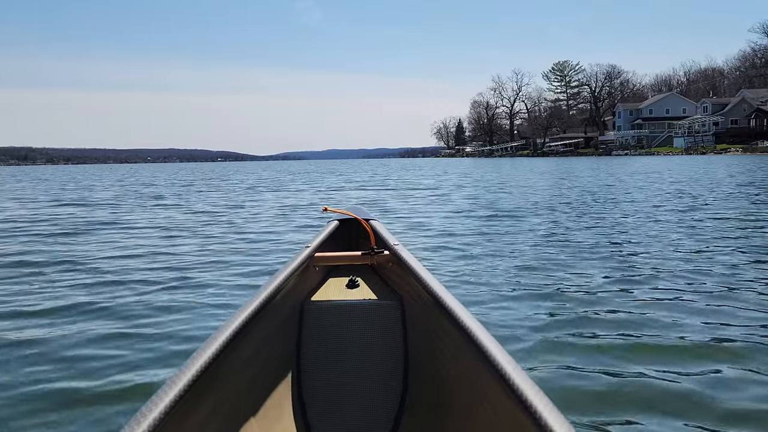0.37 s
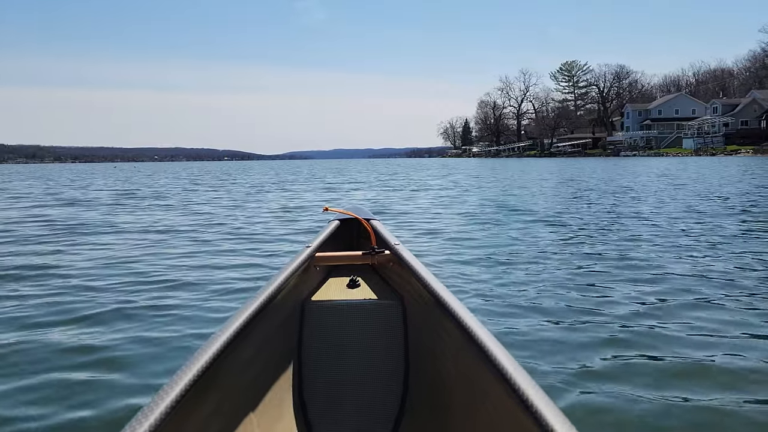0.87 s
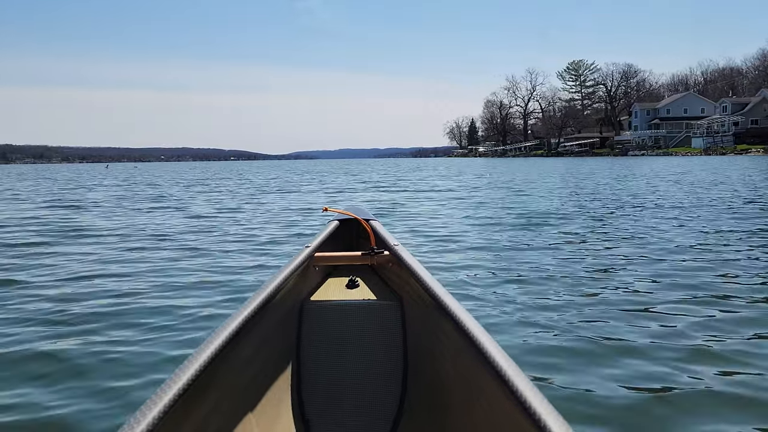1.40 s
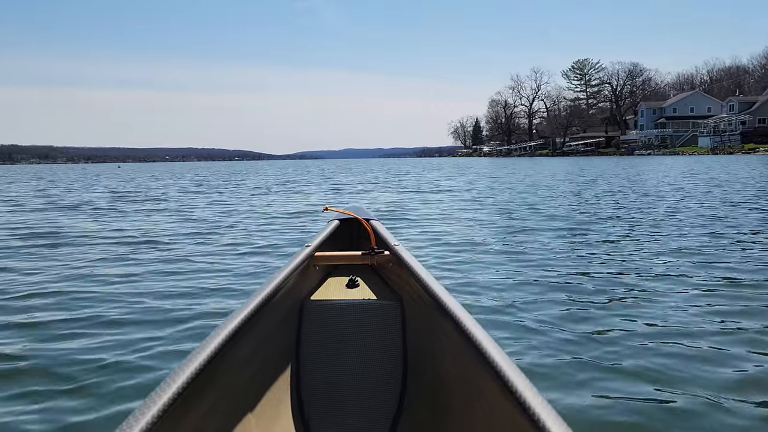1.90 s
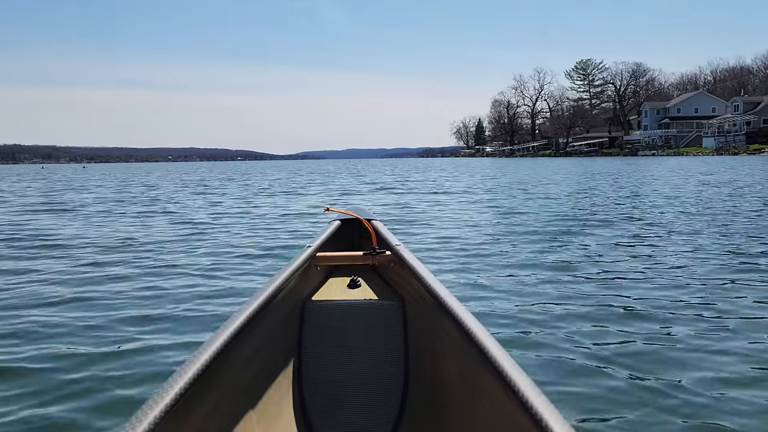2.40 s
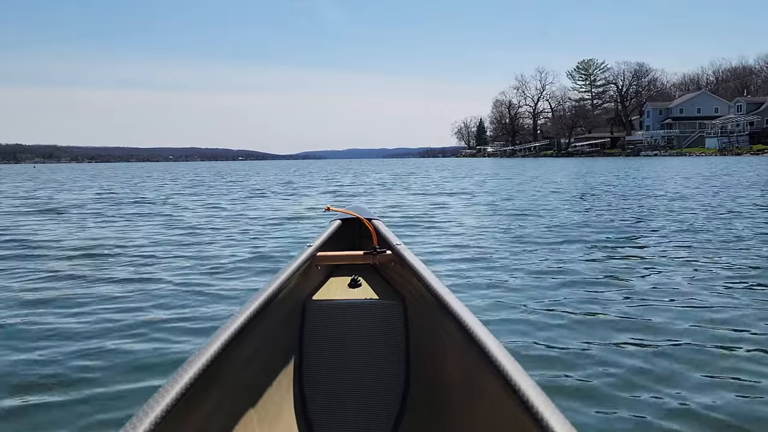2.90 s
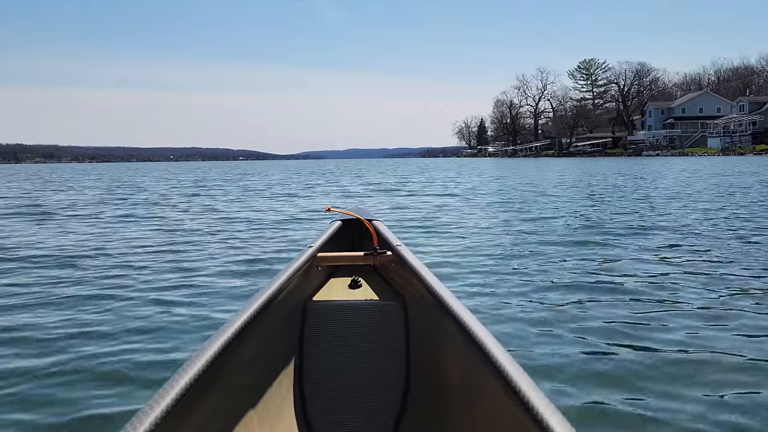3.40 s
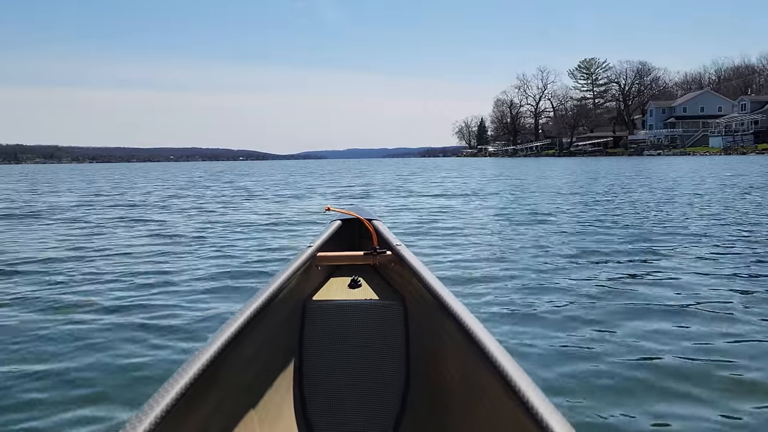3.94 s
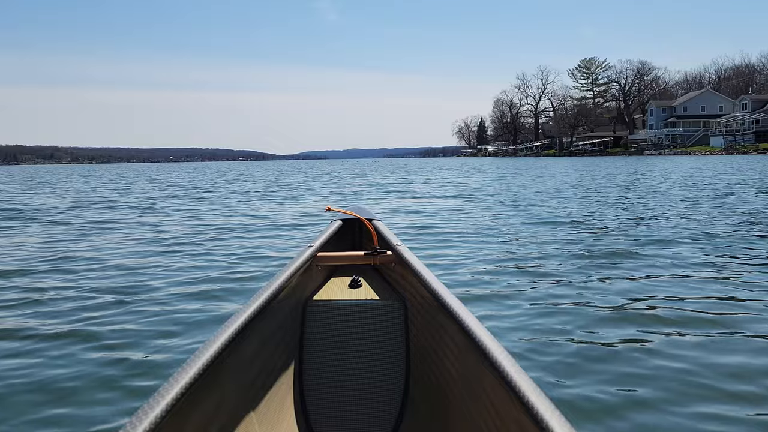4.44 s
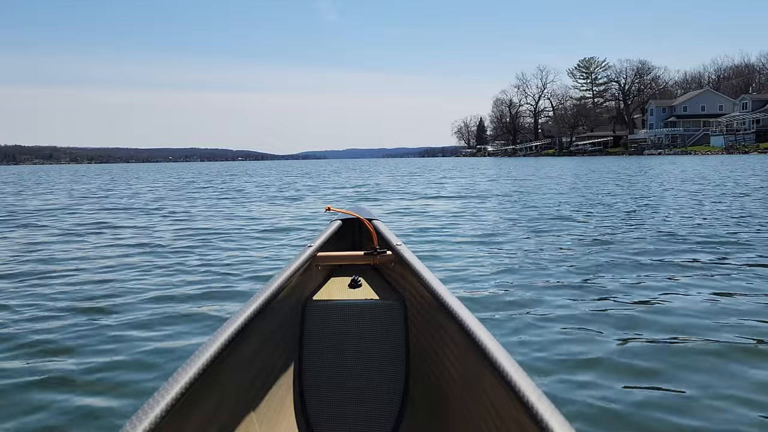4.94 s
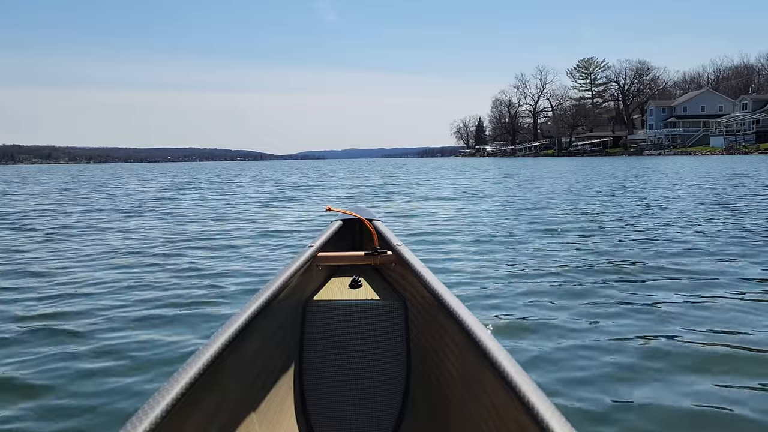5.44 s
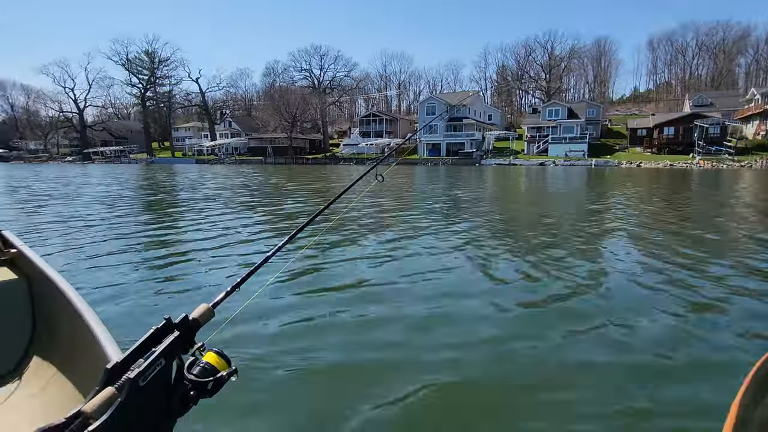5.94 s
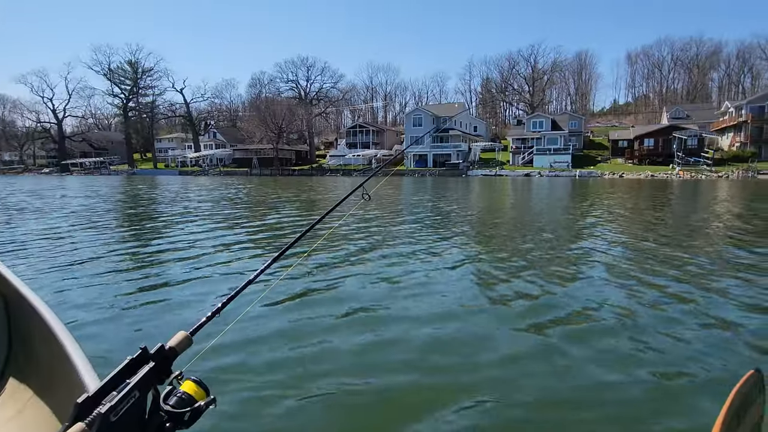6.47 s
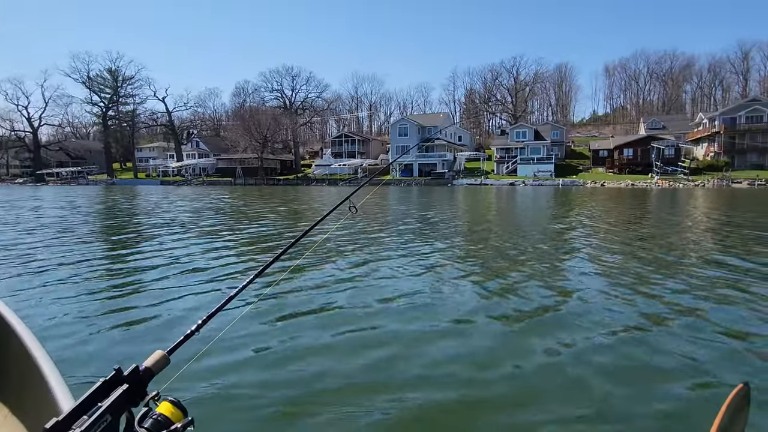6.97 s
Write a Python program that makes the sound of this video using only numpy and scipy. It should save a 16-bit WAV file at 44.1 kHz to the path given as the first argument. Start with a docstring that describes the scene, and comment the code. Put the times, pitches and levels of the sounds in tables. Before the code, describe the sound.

From 0 to 0.3 s, a paddle blade splashes close on the right, with bright fizz, sharp droplets and gurgling water. Trickles continue, with another splash at 0.5-0.8 s and a very light knock near 0.54. At 1.04 s the shaft thuds on the hollow hull, knocks again at 1.13, then gives a strong thump at 1.29 with a quick rattle of weaker knocks to 1.45; a bright drip lands at 1.34. From 1.6 to 6 s the water is much quieter: small wavelets, plinking drops and round low glugs, clearest around 2.2-2.3 s, slowly thinning. Faint falling bird chirps come at 3.3, 4.9 and 5.8 s on the right. Low distant rumble and slight hiss run throughout. Just before 6 s the water stops abruptly, leaving rumble, hiss and very faint wavering bird whistles until about 7.1 s.

```python
"""Water splashes and trickles off a canoe paddle on the right, as swarms of damped-sine bubbles over patchy noise.
Single drops and hollow glugs are damped sines; the shaft knocks on the hull as ringing modes under a noise crack.
Ripples gurgle along the side as the boat glides, then the water stops and the end is quieter.
Far rumble and hiss are filtered noise, small birds are gliding sines; two ports a few centimetres apart hear it all."""
import sys
import numpy as np
from scipy import signal
from scipy.fft import rfft, irfft, next_fast_len
from scipy.io import wavfile
from scipy.ndimage import uniform_filter1d, map_coordinates

SR = 44100
rng = np.random.default_rng(int(sys.argv[2]) if len(sys.argv) > 2 else 0)


def output_pcm(signal):
    """Save a mono or channel-first signal as 16-bit PCM at the path in sys.argv[1].

    Samples are clipped to [-1, 1] before scaling.
    """
    pcm = np.clip(np.atleast_2d(signal).T, -1, 1) * 32767
    wavfile.write(sys.argv[1], SR, np.round(pcm).astype(np.int16))


def elevation(decibels):
    """Turn decibel levels (scalar or array-like) into linear amplitude ratios."""
    levels = np.asarray(decibels, float)
    return 10 ** (levels / 20)


N = 312669
LAG_MS = 0.21  # sound from the right reaches the left port this much later


def unit(x):
    """Scaled to rms 1."""
    return x / np.sqrt(np.mean(x ** 2) + 1e-20)


def along(points, hz):
    """Reads (f/Hz, value) points on a log frequency axis."""
    f, v = np.transpose(points)
    return np.interp(np.log(hz + 1), np.log(f + 1), v)


def curves(rows):
    """One value per sample for each column after the time."""
    s, *cols = np.transpose(rows)
    return [np.interp(np.arange(N) / SR, s, c) for c in cols]


def wobble(rate):
    """A smooth random curve, rate knots a second."""
    knots = rng.standard_normal(int(N * rate / SR) + 4)
    return map_coordinates(knots, [np.arange(N) * rate / SR])


def filtered(x, response):
    """x shaped by a complex response of frequency."""
    m = next_fast_len(N + 8192)
    return irfft(rfft(x, m) * response(np.fft.rfftfreq(m, 1 / SR)), m)[..., :N]


def rush(spectrum, alike, patchy_db):
    """Stereo noise of rms 1: random gain patches, a spectrum, and a left-right likeness per frequency."""
    z = signal.stft(rng.standard_normal((2, N)), nperseg=512)[2]
    field = uniform_filter1d(rng.standard_normal(z.shape[1:]), size=5, axis=0)
    field = uniform_filter1d(field, size=4, axis=1)
    pair = signal.istft(z * elevation(patchy_db * unit(field)), nperseg=512)[1][:, :N]

    def mid_side(hz):
        turn = np.arccos(np.clip(along(alike, hz), -1, 1)) / 2
        return elevation(along(spectrum, hz)) * [np.cos(turn), np.sin(turn)]

    mid, side = filtered(pair, mid_side)
    return unit(np.array([mid + side, mid - side]))


# left-right balance of sound from the right, before each source scales it: (f/Hz, left-right level/dB)
SIDE_BALANCE = [(300, 0), (2400, -2.5), (5000, -11.5), (8000, -11.5), (15000, 9.5)]


def from_right(pair, shade):
    """Sound from the right reaches the left port late and tilts the ports' balance by shade times the table."""
    sides = np.array([[1], [-1]])  # left, right

    def response(hz):
        gain = elevation(sides * shade * along(SIDE_BALANCE, hz) / 2)
        return gain * np.exp(-1j * np.pi * hz * sides * LAG_MS / 1000)

    return filtered(pair, response)


def bubbles(s, db, hz, t60, pan_db, rise, lag_ms, size):
    """Bubbles ring as damped sines that glide in pitch (rise: fraction per s); the left port lags by lag_ms."""
    out = []
    start = np.round(s * SR).astype(int)[:, None] + np.arange(size)
    for side in (1, -1):
        t = np.maximum(np.arange(size) / SR - (0.00024 + side * lag_ms[:, None] / 2000), 0)
        glide = np.minimum(t, t60[:, None] / 2)  # the neck closes, the pitch settles
        phase = 2 * np.pi * hz[:, None] * (t + rise[:, None] * glide * (t - glide / 2))
        swell = 1 - np.exp(-t * hz[:, None] * 4.6)
        decay = elevation((db + side * pan_db / 2)[:, None] - 60 * (t / t60[:, None]) ** 1.63)
        wave = decay * swell * np.sin(phase)
        out.append(np.bincount(start.ravel(), wave.ravel(), N + size)[:N])
    return np.array(out)


def swarm(breaking_db, count, hz, octaves, cycles, spread_db, size):
    """Random small bubbles of rms 1 in all, bunched where ripples break; each rings for about so many cycles."""
    u = rng.random((count, 3))
    g = rng.standard_normal((count, 3))
    chance = np.cumsum(elevation(breaking_db + 4.5 * wobble(30)))
    s = np.interp(u[:, 0], chance / chance[-1], np.arange(N) / SR)
    pitch = np.clip(hz * 2 ** (octaves * g[:, 0]), 200, 15000)
    t60 = np.minimum(cycles * np.exp(0.51 * g[:, 1]) / pitch, size / SR)
    level_db = -spread_db * np.log(u[:, 1])
    return unit(bubbles(s, level_db, pitch, t60, 9.1 * g[:, 2], 0.36 * u[:, 2] / t60, 0 * s, size))


# water running off the blade, calming as the boat slows: (t/s, fizz level/dB, gurgle level/dB)
RUNOFF_LEVELS = [(0, -64, -53), (.4, -67, -59), (.95, -70.5, -62), (1.25, -67, -54), (1.6, -79.5, -62),
                 (3.5, -81.5, -64), (5.98, -84.5, -66.5)]
# blade splashes, then wavelets that break on the side: (t/s, hold/s, fizz level/dB, gurgle level/dB)
SPLASH_EVENTS = [(0, 0.051, -56.5, -50), (0.127, 0.032, -57, -70), (0.256, 0.011, -69, -58),
                 (0.528, 0.0087, -56, -46.5), (0.56, 0.061, -57.5, -56), (0.737, 0.045, -61, -65),
                 (0.833, 0.012, -66, -57), (1.81, .06, -76, -63), (2.114, 0.093, -74.5, -69),
                 (2.333, 0.064, -75, -79), (2.53, 0.052, -88, -63), (2.764, 0.033, -78, -76),
                 (3.135, 0.15, -75.5, -86), (3.461, 0.077, -82, -60), (3.82, 0.033, -74.5, -62),
                 (4.143, 0.14, -77, -62), (4.363, 0.097, -77, -72), (4.81, 0.036, -81, -62.5),
                 (5.068, 0.035, -76, -63.5), (5.4, 0.017, -73.5, -65), (5.734, 0.022, -87.5, -65),
                 (5.857, .1, -81, -71.5)]


def stir():
    """Fizz, gurgle and spray drive: each splash swells, holds and dies over the run-off, adding in power."""
    rise_db_s, fall_db_s = 500, 169
    t = np.arange(N) / SR
    power = elevation(2 * np.array(curves(RUNOFF_LEVELS)))
    for s, hold, *peak_db in SPLASH_EVENTS:
        loss_db = rise_db_s * np.maximum(s - t, 0) + fall_db_s * np.maximum(t - s - hold, 0)
        power = power + elevation(2 * (np.array(peak_db)[:, None] - loss_db))
    fizz_db, gurgle_db = 10 * np.log10(power)
    spray_db = -70 + 1.66 * (fizz_db + 58)  # fine spray grows faster than the fizz
    return fizz_db, gurgle_db, spray_db


# air pockets under the hull's curve: (f/Hz, width/Hz, relative level/dB, t/s when it fills with water)
AIR_POCKETS = [(525, 16, -1.5, 4.6), (841, 46, -5, 7.5)]


def pockets():
    """Small slaps, as uneven noise, ring each air pocket's resonance until it fills."""
    out, t = 0, np.arange(N) / SR
    for centre, width, db, full in AIR_POCKETS:
        fade = np.clip((full - t) / 0.37, 0, 1)
        slaps = rng.standard_normal(N) * elevation(6.9 * wobble(25)) * fade
        ring = filtered(slaps, lambda f: 1j * f * width / (centre * centre - f * f + 1j * f * width))
        out = out + elevation(db) * unit(ring)
    return out


# noise colour of the gurgle: (f/Hz, relative level/dB per Hz)
GURGLE_COLOUR = [(150, -36), (250, -3), (675, -6.5), (861, -5), (1010, -10.5), (3500, -22.5), (4550, -47.5),
                 (7700, -120)]


def gurgle_layer(breaking_db):
    """Low water: patchy noise, ringing air pockets and a swarm of larger bubbles."""
    gurgle = 0.65 * rush(GURGLE_COLOUR, [(300, 0.79), (2000, 0.13)], patchy_db=6.5) + 0.3 * pockets()
    gurgle += 0.65 * swarm(breaking_db, count=1400, hz=1149.5, octaves=0.617, cycles=63, spread_db=1.5, size=1500)
    return gurgle


# noise colour of the fizz: (f/Hz, relative level/dB per Hz)
FIZZ_COLOUR = [(1500, -10.5), (2200, -1), (3100, 1), (4200, -8), (5800, -26.5), (7300, 2), (8400, -13.5),
               (10000, -27.5)]
# broad hiss of a strong splash: (f/Hz, relative level/dB per Hz)
WASH_COLOUR = [(900, -29.5), (1800, -3), (4500, 1), (7500, -10.5), (10000, -19.5)]


def fizz_layer(breaking_db, fizz_db):
    """Bright water: small bubbles and droplet ticks that merge into a smooth wash in a strong splash."""
    merge = elevation(.3 * (fizz_db + 78))
    fizz = 0.52 * merge * rush(FIZZ_COLOUR, [(3000, 0.18)], patchy_db=4)
    fizz += 0.83 * swarm(breaking_db, count=1800, hz=2870, octaves=0.43, cycles=34, spread_db=4.5, size=900)
    fizz += 0.5 * swarm(breaking_db, count=1500, hz=6420, octaves=0.23, cycles=72, spread_db=3.0, size=400)
    # droplets hit with a short tick
    ticks = swarm(breaking_db, count=700, hz=4530, octaves=0.45, cycles=5.7, spread_db=4.0, size=120)
    fizz += 0.16 * merge ** .6 * ticks
    fizz += 0.22 * merge * rush(WASH_COLOUR, [(3000, .3)], patchy_db=2.0)
    return fizz


def spray_layer(breaking_db):
    """Fine spray: top-end noise with a swarm of tiny ticks."""
    colour = [(8000, -30), (9500, -7), (13000, -6), (15800, -7), (16300, -40)]
    spray = 1.3 * rush(colour, [(9000, .3)], patchy_db=4)
    ticks = swarm(breaking_db, count=1200, hz=11500, octaves=.3, cycles=12, spread_db=6.5, size=200)
    return spray + 0.64 * ticks


def water():
    """Gurgle, fizz and spray follow the stirring of the water, surging together, until it falls silent."""
    glide_end = 5.98  # s
    fizz_db, gurgle_db, spray_db = stir()
    surge = wobble(9.8)
    breaking_db = 5.5 * wobble(14)  # all bubble sizes crowd where a ripple breaks
    mix = elevation(gurgle_db + 0.2 * surge) * gurgle_layer(breaking_db)
    mix += elevation(fizz_db + 0.53 * surge) * fizz_layer(breaking_db, fizz_db)
    mix += elevation(spray_db + 0.53 * surge) * spray_layer(breaking_db)
    return from_right(mix * (np.arange(N) / SR < glide_end), shade=0.83)


# slow ride of the far rumble: (t/s, level/dB rms before a small random waver)
RUMBLE_LEVEL = [(.5, -50.5), (1.8, -49.5), (2.3, -52.5), (2.9, -54), (3.7, -53), (5.75, -52), (6.1, -53.5)]
# colour of the rumble: (f/Hz, relative level/dB per Hz)
RUMBLE_COLOUR = [(13, -44.5), (22, -25), (53, -3.5), (107, -1.5), (129, -6.5), (180, -11.5), (226, -19.5),
                 (288, -23.5), (320, -22), (1400, -47.5), (1820, -85.5), (3080, -120)]
# how alike the ports hear the rumble: (f/Hz, left-right likeness)
RUMBLE_LIKENESS = [(60, 1), (180, 0.96), (600, .2), (1500, 0)]
# colour of the hiss: (f/Hz, relative level/dB per Hz)
HISS_COLOUR = [(700, -40.5), (1300, 4), (2500, -0.5), (6000, -7), (7800, -2.5), (9000, -27), (15000, -8),
               (16300, -33.5)]


def air():
    """Far low rumble and the microphone's own steady hiss, both filtered noise."""
    rumble_db = curves(RUMBLE_LEVEL)[0] + 1.3 * wobble(4.52)
    rumble = elevation(rumble_db) * rush(RUMBLE_COLOUR, RUMBLE_LIKENESS, patchy_db=-0.04)
    hiss = elevation(-82.5) * rush(HISS_COLOUR, [(3000, 0)], patchy_db=0)
    return rumble + hiss


def followers(s, db, hz, count):
    """Every loud bubble starts with a tick of impact and sheds a few smaller neighbours just after."""
    s, db, hz = np.repeat([s, db, hz], count, axis=1)
    u, g = rng.random(len(s)), rng.standard_normal((len(s), 3))
    pitch = np.clip(hz * np.exp(.16 * g[:, 0]), 200, 15000)
    t60 = 30 / pitch
    shed_s = s + u * 45 / pitch
    shed_db = db - 10.5 + 3 * g[:, 1]
    shed = bubbles(shed_s, shed_db, pitch, t60, -5 + 3 * g[:, 2], 0.31 / t60, LAG_MS + 0 * s, size=3000)
    tick_hz = 2.5 * pitch[::count].clip(0, 4000)
    zero = 0 * tick_hz
    tick = bubbles(s[::count], db[::count] - 1.0, tick_hz, 4 / tick_hz, zero - 4, zero, LAG_MS + zero, size=300)
    return shed + tick


# the loudest single drops: (t/s, peak level/dB, start f/Hz, t60/ms, pitch rise/% per ms)
LOUD_DROPS = [(.0012, -29, 2310, 19, 2.1), (.0211, -30, 8800, 1.9, 1.5), (.0393, -38.5, 3280, 11, 2.1),
              (.0733, -30, 6600, 2.4, 23), (.0878, -41, 4580, 4.5, 1.5), (.1136, -27.5, 2026, 7.1, 3.5),
              (.1276, -33, 3090, 9.6, 7.3), (.1605, -28, 8550, 1.3, 1.5), (.174, -28.5, 5900, 2.3, 56),
              (.2236, -34, 840, 34, 0.055), (.224, -33.5, 3150, 7.6, 0.21), (.3274, -41, 4730, 7.5, 1.7),
              (.439, -34, 1350, 8.9, .6), (.4676, -34, 1230, 10, 0.18), (.483, -42.5, 1330, 40, 2.1),
              (.6258, -40, 4280, 5.6, .3), (.7005, -34.5, 7600, 2.7, 20), (.7468, -28, 12500, 1.1, .3),
              (.789, -37, 6320, 3.6, 50), (.8556, -36.5, 3080, 13, .2), (1.3407, -29, 3640, 10.6, 30.4),
              (1.5466, -42.5, 2430, 11, 3), (1.6234, -55.5, 3580, 16, 2.8), (1.8298, -51, 7300, 2.2, 1.5),
              (2.0014, -46.5, 9800, 8, .3), (2.0017, -47.5, 4170, 4.6, 0.28),
              (2.0945, -50.5, 1370, 31, 1.4), (2.148, -38.5, 3550, 1, .3), (2.1848, -47, 1630, 14, 0.93),
              (2.2418, -53, 7000, 16, 2.5), (2.308, -56, 1370, 43, .2), (2.3475, -58, 4040, 37, 1.9),
              (2.5131, -50, 1830, 54, 0.56), (2.547, -52, 2650, 36, 0.24), (2.5895, -43.5, 2710, 3.2, 1.1),
              (2.6205, -56, 8120, 10, .6), (2.6927, -48, 700, 20, .6), (2.7637, -45.5, 4320, 1.2, 1.5),
              (3.2492, -43, 1510, 6, 2.1), (3.481, -54, 2700, 8.9, 0.33), (3.6184, -51.5, 2510, 7.2, 1.2),
              (3.9642, -51, 2810, 18, 0.27), (4.13, -51, 2700, 14, 0.52), (4.33, -50, 2800, 10, 2.5),
              (4.51, -50.5, 1930, 23, 4.7), (4.7512, -50, 1224, 52, 0.98), (4.834, -44, 2260, 3.1, .3),
              (4.9008, -51.5, 6000, 7.7, 13.5), (4.9931, -53.5, 807, 50, .2), (5.3134, -49, 772, 33, 0.6),
              (5.433, -44, 847, 49, 0.51), (5.545, -49, 777, 18, 2.2), (5.7746, -50.5, 1220, 33, 3.2),
              (5.967, -52, 1734, 11, 4.5)]


def drops():
    """Loud single drops on the paddle side; the higher they ring, the more the left port is shaded."""
    s, db, hz, t60_ms, rise = np.transpose(LOUD_DROPS)
    pan_db = -3 - 6.5 * np.log2(np.maximum(hz / 2000, 1))  # left-right; 6.5 dB per octave above 2 kHz
    level_db = db - 10 * np.log10(np.cosh(pan_db * np.log(10) / 20))  # level is the mean of both ports
    loud = bubbles(s - .0006, level_db, hz, t60_ms / 1000, pan_db, 10 * rise, LAG_MS + 0 * s, size=5000)
    return loud + followers(s, db - 10.5, hz, count=3)


# the loudest glugs of air trapped along the hull: (t/s, peak level/dB, f/Hz)
LOUD_GLUGS = [(.392, -47.5, 530), (.674, -47.5, 550), (.953, -49.5, 440), (2.024, -53, 846),
              (2.19, -45.5, 513), (2.31, -42.5, 522), (2.44, -52.5, 515), (2.514, -54, 740),
              (2.808, -49.5, 500), (2.849, -49.5, 522), (3.657, -55, 525), (3.968, -50.5, 525),
              (4.141, -49.5, 546), (4.44, -52, 620), (5.157, -52, 824), (5.703, -56, 830)]


def glugs(count=14):
    """Low hollow bubbles that live about two dozen cycles; faint random ones ring near the pockets' pitch."""
    u = rng.random((count, 3))
    start, end = 1.7, 4.2  # s, span of the faint glugs
    soft_s = start + (end - start) * u[:, 0]
    soft_db = -55 + 4 * (u[:, 1] - .5)
    pocket_hz = np.where(u[:, 2] < .7, AIR_POCKETS[0][0], AIR_POCKETS[1][0])
    soft_hz = pocket_hz * (.93 + 0.13 * u[:, 1])
    s, db, hz = np.hstack([np.transpose(LOUD_GLUGS), [soft_s, soft_db, soft_hz]])
    g = rng.standard_normal((len(s), 2))
    t60 = 26 * np.exp(.25 * g[:, 0]) / hz
    pan_db = -2.5 + 1.3 * g[:, 1]
    hollow_bubbles = bubbles(s - .002, db, hz, t60, pan_db, 0.051 / t60, LAG_MS + 0 * s, size=5000)
    return hollow_bubbles + followers(s, db, hz, count=2)


def hollow(pair, t60):
    """The open hull answers each port with its own short diffuse tail of decaying noise."""
    tail = rng.standard_normal((2, SR // 4)) * elevation(-60 * np.arange(SR // 4) / SR / t60)
    return signal.fftconvolve(pair, tail / np.linalg.norm(tail[0]), axes=1)[:, :N]


# shaft on the hull: (t/s, relative boom level/dB, relative crack level/dB,
# crack brightness/dB per octave above 1500 Hz, share of the free ring time)
SHAFT_HITS = [(0.538, -25, -39, 0, 0.22), (1.04, -10.5, -33.5, -1.5, 0.84), (1.125, -17, -39.5, -1.5, 0.92),
              (1.286, -8.5, -31, 0, 0.96), (1.326, -14.5, -39, -10, 0.78), (1.386, -14.5, -40.5, 0, 0.79),
              (1.41, -15, -44, -3.5, 0.46), (1.451, -24, -48.5, -2.5, 1)]
# hull modes: (f/Hz, relative level/dB, free t60/s, signed gain at the microphone)
HULL_MODES = [(73, -15, 0.42, 0.98), (116, -19, 0.35, 1), (151.6, -4.5, 0.19, -1.13),
              (173.5, 1, 0.29, 0.83), (223, 4.5, 0.12, 0.86), (280, -10.5, 0.12, 0.91),
              (321, -9, 0.13, 0.51), (377.5, -15.5, 0.16, -1.33), (434.5, -9.5, 0.093, -0.74),
              (594, -10.5, 0.088, -1.3), (620, -9.5, 0.076, 1), (751, -10.5, 0.063, 1),
              (1230, -15, 0.028, 0.93)]
# colour of the contact crack: (f/Hz, relative level/dB)
CRACK_COLOUR = [(250, -5), (500, 2), (1300, 1), (3000, -6.5), (5500, -18), (7500, -7.5), (11000, -26.5),
                (16000, -27)]
# how long the crack rings: (f/Hz, t60/s)
CRACK_RING = [(400, 0.29), (1200, 0.064), (4000, 0.042), (12000, 0.0098)]


def knocks():
    """A crack comes through the air; the boom swells as bending waves arrive and gather a few ms later."""
    out, t = np.zeros((2, N + SR)), np.arange(SR // 2) / SR
    hz, level, t60, polarity = np.transpose(HULL_MODES)[:, :, None]
    spot = np.clip(hz / 900, 0, 1)  # short waves depend on where the shaft lands
    skew = spot * rng.normal(0, 0.69, hz.shape)  # shorter waves differ more between the ports
    for s, db, crack_db, bright_db, free in SHAFT_HITS:
        mode_db = db - 5.5 + level + spot * rng.normal(0, 4.6, hz.shape)
        size = polarity * elevation(mode_db - 60 * t / (t60 * free))
        tuned = hz * (1 + spot * rng.normal(0, 0.047, hz.shape))  # the shaft's weight shifts the upper modes
        phase = 2 * np.pi * tuned * (t - .0045) - .4
        swell = 1 - np.exp(-(t / 0.003) ** 2)
        boom = [swell * np.sum(size * np.sin(phase + side * skew), axis=0) for side in (1, -1)]
        f, frames, z = signal.stft(rng.standard_normal((2, SR // 2)), SR, nperseg=128)
        # a soft contact is duller
        colour_db = along(CRACK_COLOUR, f) + bright_db * np.log2(np.maximum(f, 1500) / 1500)
        decay_db = 60 * frames / along(CRACK_RING, f)[:, None]
        z = (0.35 * z[0] + z) * elevation(colour_db[:, None] - decay_db)
        crack = elevation(crack_db + 13.5) * signal.istft(z, SR, nperseg=128)[1][:, :len(t)]
        out[:, round(s * SR):][:, :len(t)] += boom + crack
    return from_right(out[:, :N], shade=0.8)


def sing(rows, rough_db):
    """A slightly hoarse sine along (t/s, f/Hz, level/dB) points, silent outside them."""
    hz, db = curves(rows)
    t = np.arange(N) / SR
    gate = np.clip(np.minimum(t - rows[0][0], rows[-1][0] - t + 0.016) / 0.0081, 0, 1)
    waver = 1 + .005 * wobble(120)
    level = np.sqrt(2) * gate * elevation(db + rough_db * wobble(90) + 2.2 * wobble(25))
    return level * np.sin(2 * np.pi * np.cumsum(hz * waver) / SR)


# contour of one chirp, falling in two parts: (t/s from its start, f/Hz, relative level/dB)
CHIRP_CONTOUR = [(0, 4070, -9), (0.018, 3800, -22), (.04, 3450, -20), (.052, 3290, -7), (.062, 3500, -11),
                 (.078, 3400, -8), (.09, 3130, -8), (.1, 3080, -9)]
# when the bird calls: (t/s, level/dB added to the contour)
CHIRP_CALLS = [(3.264, -66.5), (4.865, -69.5), (5.775, -69)]


def chirps():
    """A bird on the right shore repeats one gliding sine, with an echo off the water 400 samples later."""
    calls = 0
    for s, db in CHIRP_CALLS:
        calls = calls + sing([(s + dt, hz, db + d) for dt, hz, d in CHIRP_CONTOUR], rough_db=3)
    calls += 0.47 * np.roll(calls, shift=400)
    return from_right(np.array([calls, calls]), shade=3.2)


# far wavering whistles, one list of points each: (t/s, f/Hz, level/dB rms before roughness)
WHISTLE_LINES = [
    [(6.245, 1630, -87), (6.33, 1650, -90), (6.45, 1570, -92)],
    [(6.49, 1640, -92), (6.518, 1617, -75), (6.556, 1686, -81), (6.582, 1674, -88), (6.758, 1615, -70.5),
     (6.782, 1670, -85), (6.982, 1590, -86.5), (7.086, 1674, -72), (7.09, 1700, -68)],
    [(6.75, 2477, -90), (6.84, 2460, -82), (6.9, 2400, -91.5), (7.01, 2370, -84.5)],
    [(6.31, 3450, -82), (6.33, 3430, -73), (6.345, 3410, -83.5)],
]


def whistles():
    """Birds further off whistle as wavering sines that reach the right port five samples early."""
    far = sum(sing(rows, rough_db=4.0) for rows in WHISTLE_LINES)
    return np.array([far, np.roll(far, shift=-5)])


def scene():
    """All sources at the two ports; drops and glugs also excite the open hull."""
    near = drops() + glugs()
    hull_tail = elevation(-11.5) * hollow(near, t60=0.082)
    return water() + near + hull_tail + knocks() + chirps() + whistles() + air()


def band_limit(x):
    """A steep low-pass at the top of the band."""
    return signal.sosfilt(signal.butter(12, 16600, fs=SR, output="sos"), x)


def record(dry):
    """The finished mix of both ports, as it is delivered."""
    return band_limit(dry)


dry = scene()
out = record(dry)
output_pcm(out)
```